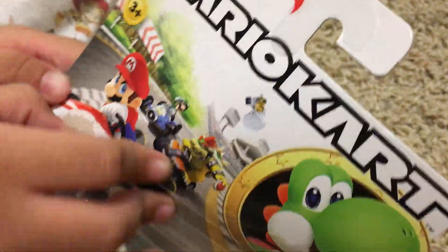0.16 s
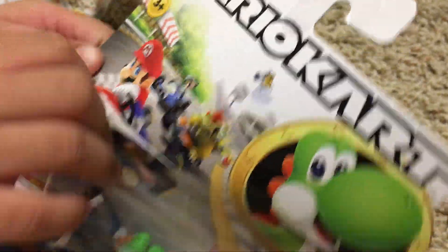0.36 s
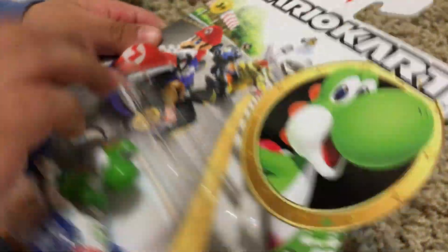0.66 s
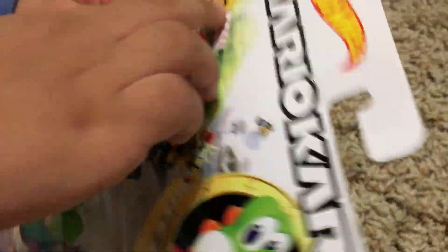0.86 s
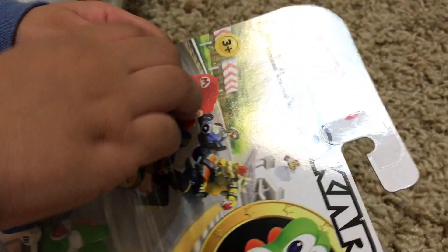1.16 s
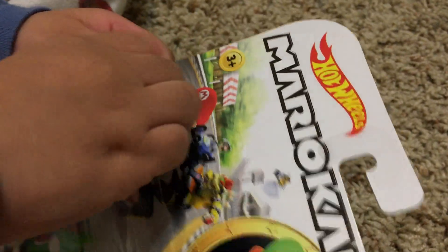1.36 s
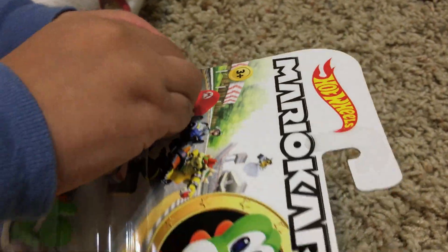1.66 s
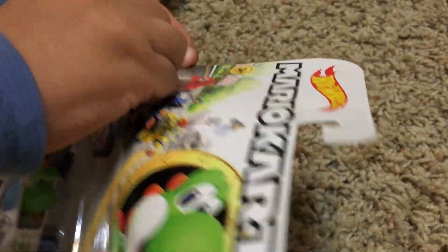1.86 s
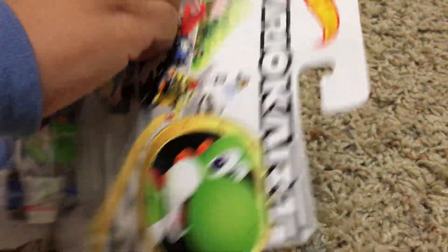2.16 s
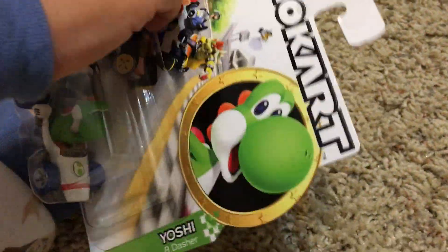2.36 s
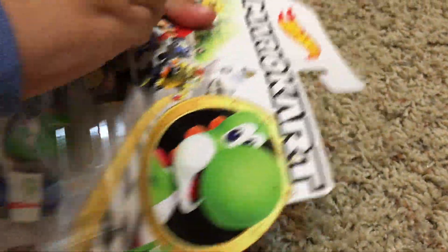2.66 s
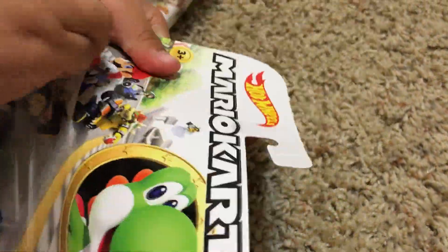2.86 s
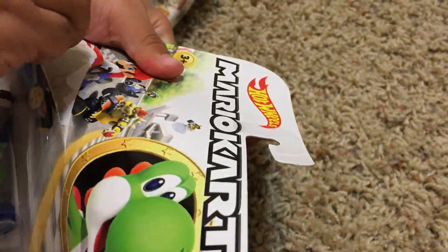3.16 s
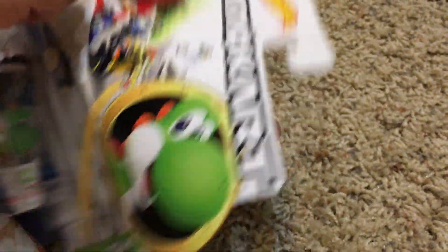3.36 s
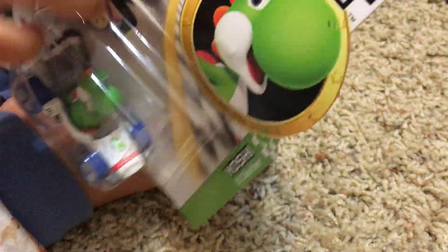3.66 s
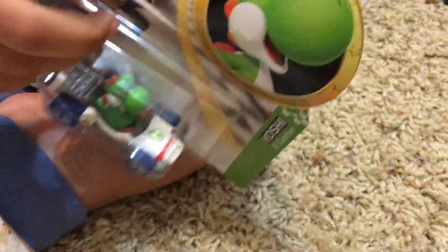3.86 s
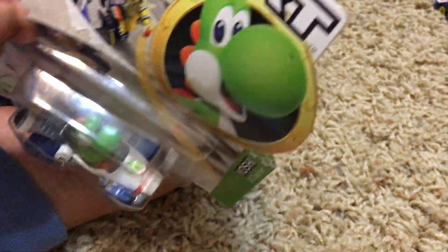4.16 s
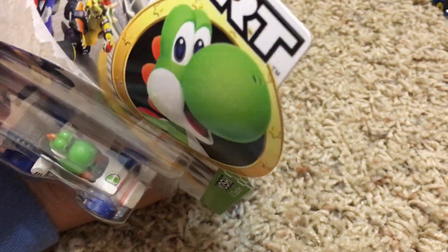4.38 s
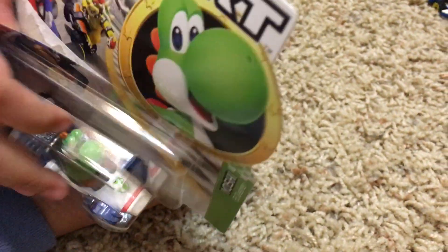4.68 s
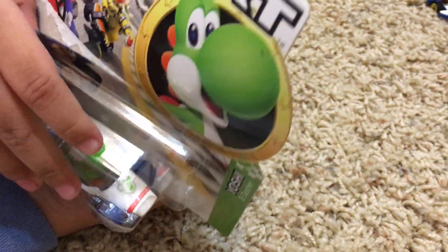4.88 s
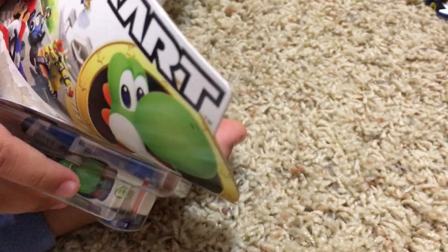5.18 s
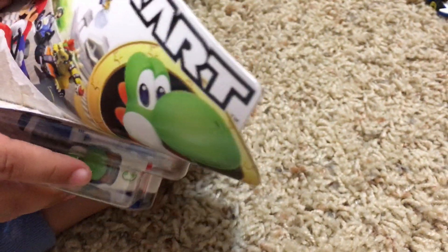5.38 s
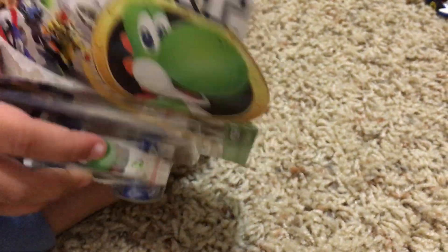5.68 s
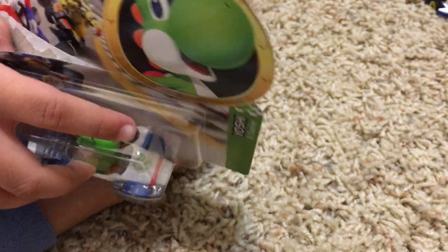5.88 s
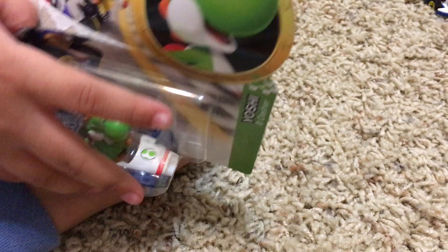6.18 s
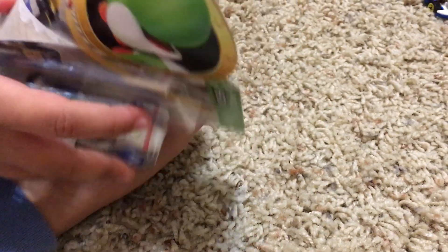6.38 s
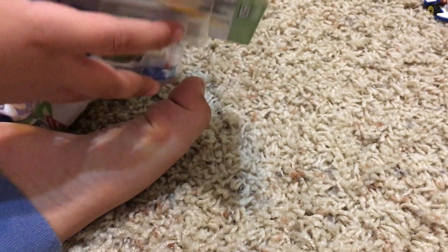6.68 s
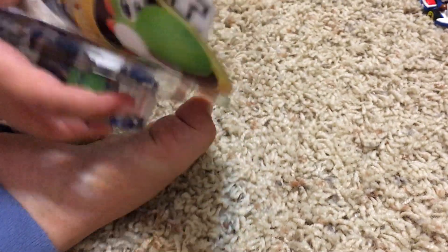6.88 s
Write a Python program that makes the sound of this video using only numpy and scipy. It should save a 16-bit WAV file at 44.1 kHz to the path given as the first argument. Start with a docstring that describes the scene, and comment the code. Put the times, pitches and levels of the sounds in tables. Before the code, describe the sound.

Close, dry sound of hands working on a toy's thin plastic and card package in a quiet carpeted living room. At first, light rubbing and a faint tear; around 0.5 s the shell buckles with one loud, sharp snap and smaller crackles, followed by soft bumps, knocks and nail taps until 1 s. Finger rubs with small creaks continue, strongest near 1.4 s. From 1.7 to 2.5 s card fizzes while plastic crunches and pops in a dense cluster, ending in dull knocks. From about 2.6 to 3.4 s a slow cardboard tear swells, bright and gritty, with fibre ticks. At 3.6-4.1 s another flurry of plastic snaps; then a sparse, quieter stretch with taps and knocks. A thin tear rises around 5.3-5.6 s, then taps and bumps near 5.7-6.1 s. Around 6.4 s crisp crackles and brief tearing, then faint rubbing and small snaps to 7 s.

```python
"""A toy's blister pack, close by on living-room carpet: its thin plastic shell buckles in snaps and crumples.
Snaps are creases and one click convolved with dying noise; resonators ring as the blister's hollow.
Fingers rub in strokes of slip grains, nails tap, soft contacts knock and bump; each hold changes the hollow.
In slow pulls the cardboard backing tears in streams of fine grains, with ticks of thick fibres.
A short, soft room tail follows and a quiet room tone lies beneath."""
import sys
import numpy as np
from scipy import signal
from scipy.io import wavfile
from scipy.ndimage import uniform_filter1d

SR = 44100
rng = np.random.default_rng(int(sys.argv[2]) if len(sys.argv) > 2 else 0)


def bounce(signal):
    """Save signal as a 16-bit WAV file at the path given by the first command-line argument."""
    frames = np.transpose(np.atleast_2d(signal))
    limited = np.clip(frames, -1, 1)
    pcm = np.round(limited * 32767).astype(np.int16)
    wavfile.write(sys.argv[1], SR, pcm)


N = 309972

EDGES_HZ = np.geomspace(22, 17000, 21)
BAND_HZ, BAND_WIDTH_HZ = np.sqrt(EDGES_HZ[1:] * EDGES_HZ[:-1]), np.diff(EDGES_HZ)
BANK = [signal.butter(2, pair, "band", fs=SR, output="sos") for pair in zip(EDGES_HZ, EDGES_HZ[1:])]
BLOW_SAMPLES = SR // 100   # a blow's level is its energy spread over this span

# Spectrum of the plastic shell. Each row: frequency in Hz, relative level in dB per Hz.
SHELL_SPECTRUM = [(50, 0), (400, 2), (700, 1.5), (1200, -3.5), (1700, -1), (2700, -4.5), (3900, -6.5),
                  (5600, -12.5), (8000, -19.5), (15000, -32)]
# Holds on the pack, each lasting until the next. Each row: start in seconds, thump in dB, hollowness in dB,
# bark near 1.2 kHz in dB, pitch of the hollow in Hz, factor by which the fingers widen its modes.
HOLDS = [(0, -10, 7, -5, 700, 1.05), (0.7, 2.5, 3, -5, 675, 1.5), (1.1, -1, 10, 1, 787, 3.6),
         (1.3, 0.5, 10.5, -14, 736, 4.6), (1.54, -2.5, 1, 12, 760, 2.7), (2.301, -12, -4, 11, 740, 1.9),
         (3.5, -6, -6, 8.5, 718, 5), (5.6, -1, 0, -13, 510, 3.1), (6.3, -1, 12.5, -13, 695, 1.6),
         (6.8, 10, 11, -8.5, 750, 3.2)]


def from_db(db):
    """Decibels to gain."""
    return 10 ** (np.asarray(db) / 20)


def blow_gain(db):
    """Gain that gives a blow of energy 1 its level in dB."""
    return np.sqrt(BLOW_SAMPLES) * from_db(db)


def unit_energy(x):
    """Each row scaled to energy 1."""
    return x / np.sqrt(np.sum(x ** 2, axis=-1, keepdims=True) + 1e-20)


def rms_one(x):
    """Each row scaled to rms 1."""
    return unit_energy(x) * np.sqrt(x.shape[-1])


def per_band(points):
    """A table over frequency, read at the band centres on a log axis."""
    hz, value = np.transpose(points)
    return np.interp(np.log(BAND_HZ), np.log(hz), value)


def band_gains(spectrum):
    """Gain of each band, with total power 1."""
    return unit_energy(from_db(per_band(spectrum)) * np.sqrt(BAND_WIDTH_HZ))


def add(out, start_s, sound):
    """Mix a sound in, starting at start_s."""
    i = max(0, round(start_s * SR))
    out[i:i + len(sound)] += sound[:max(0, N - i)]


def resonate(x, modes):
    """Parallel two-pole resonances; each mode is (Hz, width Hz, peak gain dB)."""
    out = 0
    for hz, width_hz, db in modes:
        r = np.exp(-np.pi * width_hz / SR)
        poles = [1, -2 * r * np.cos(2 * np.pi * hz / SR), r * r]
        out = out + from_db(db) * (1 - r * r) / 2 * signal.lfilter([1, 0, -1], poles, x + 1e-18)
    return out


def dying_noise(t60_s, count, size):
    """Rows of dense modes, struck at once and dying together."""
    return rng.standard_normal((count, size)) * from_db(-60 * np.arange(size) / SR / t60_s)


def coloured(spectrum, source):
    """A fresh draw of the source in each band, shaped to a spectrum."""
    return sum(gain * rms_one(signal.sosfilt(band, source() + 1e-18))
               for band, gain in zip(BANK, band_gains(spectrum)))


def grains(spectrum, per_s, spread_db, ring_s, smooth):
    """Tiny slips of uneven size, each a brief burst of fresh noise, over a smooth hiss; rms 1."""
    sizes = from_db(spread_db * np.minimum(rng.exponential(1, N), 4))
    slips = (rng.random(N) < per_s / SR) * sizes ** 2
    power = signal.lfilter([1], [1, -np.exp(-2 / (ring_s * SR))], slips + 1e-12)
    power = power / (uniform_filter1d(power, size=2200) + 1e-9)   # the hand's pace sets the mean
    envelope = np.sqrt((np.abs(power) + smooth) / (1 + smooth))
    return rms_one(coloured(spectrum, lambda: envelope * rng.standard_normal(N)))


def ticks(spectrum, t60_s, count, size):
    """Rows of short damped bursts of one colour."""
    return sum(gain * unit_energy(signal.sosfilt(band, dying_noise(t60_s, count, size)))
               for band, gain in zip(BANK, band_gains(spectrum)))


def blows(events, spectrum, t60_s, size):
    """Single damped blows of one colour, each with its own level."""
    out = np.zeros(N)
    for (start_s, db), sound in zip(events, ticks(spectrum, t60_s, len(events), size)):
        add(out, start_s, blow_gain(db) * sound)
    return out


def cushioned(x, hz):
    """A soft contact: a second-order low-pass takes away what lies above hz."""
    return signal.sosfilt(signal.butter(2, hz, fs=SR, output="sos"), x + 1e-18)


def judder(step_s):
    """Uneven wavering that turns about once a step; rms 1."""
    return rms_one(np.interp(np.arange(N) / SR / step_s, np.arange(2000), rng.standard_normal(2000)))


def grip_at(s):
    """Thump, hollowness and bark of the hold in force at times s, in dB."""
    held_from_s, *colour_db, _, _ = np.transpose(HOLDS)
    return np.array(colour_db)[:, np.searchsorted(held_from_s[1:], s)]


def room_tone():
    """Steady noise of the quiet room, shaped band by band."""
    # Each row: frequency in Hz, relative level in dB per Hz.
    tone_spectrum = [(20, -6), (35, -11), (55, 7.5), (80, -2), (130, -3), (300, -15.5), (600, -24.5),
                     (1500, -32.5), (4000, -28.5), (15500, -39)]
    level_db = -64.5
    return from_db(level_db) * coloured(tone_spectrum, lambda: rng.standard_normal(N))


def finger_pressure():
    """In each stroke a finger lands, presses in an arch and lifts; returns pressure as a level in dB."""
    # Slides on the pack. Each row: start in seconds, length in seconds, mid-stroke level in dB.
    strokes = [(0, 0.17, -70), (0.23, 0.16, -62), (0.477, 0.04, -54), (0.547, 0.093, -47.5),
               (0.807, 0.14, -58.5), (0.938, 0.043, -51), (1.045, 0.18, -58), (1.212, 0.14, -54.5),
               (1.414, 0.083, -43), (1.854, 0.078, -55.5), (1.999, 0.098, -42.5), (2.174, 0.19, -53.5),
               (2.467, 0.049, -51.5), (3.252, 0.14, -64.5), (3.647, 0.027, -51), (3.825, 0.06, -51),
               (4.018, 0.048, -43), (4.73, 0.081, -61), (4.961, 0.034, -63), (5.721, 0.095, -52.5),
               (5.958, 0.3, -62), (6.43, 0.059, -43.5), (6.905, 0.16, -53.5)]
    resting_db = -77.5   # the holding fingers never lie quite still
    swell_db, land_db_per_s, lift_db_per_s = 5.5, 598.5, 322
    t, db = np.arange(N) / SR, resting_db
    for start_s, length_s, level_db in strokes:
        arch = swell_db * np.interp(t, [start_s, start_s + length_s], [-1, 1]) ** 2
        landing = land_db_per_s * np.maximum(start_s - t, 0)
        lifting = lift_db_per_s * np.maximum(t - start_s - length_s, 0)
        db = np.maximum(db, level_db - arch - landing - lifting)
    return db


def rubbing(level_db, slide_db):
    """Skin slides smoothly under a light touch; pressed harder, it sticks and slips and the plastic crackles."""
    # Each row: frequency in Hz, relative level in dB per Hz.
    friction_spectrum = [(60, 1.5), (400, 3), (750, 5), (1200, -1), (2200, -2), (4000, -9.5), (8000, -18),
                         (15000, -32)]
    db = finger_pressure()
    smooth = from_db(slide_db - db)
    return from_db(db + level_db) * grains(friction_spectrum, per_s=590, spread_db=3.0, ring_s=0.0012, smooth=smooth)


def hollow(drive):
    """The blister and its air ring at the pitch of each hold; gripping fingers shorten the ring."""
    # Each row: multiple of the hollow's pitch, width in Hz before the hold widens it, gain in dB.
    hollow_modes = [(1, 28.03, -1.5), (1.25, 26, -2.5), (1.6, 68, -10), (2.3, 130, -8.5)]
    out, t = np.zeros(N), np.arange(N) / SR
    ends_s = [hold[0] for hold in HOLDS[1:]] + [N / SR]
    for (start_s, _, hollow_db, _, hz, damping), end_s in zip(HOLDS, ends_s):
        modes = [(hz * multiple, width_hz * damping, db) for multiple, width_hz, db in hollow_modes]
        held = (t >= start_s) & (t < end_s)
        out += from_db(hollow_db) * resonate(drive * held, modes)
    return out


def card_hoot(rub):
    """The stiff card hoots under a sliding finger, as strongly as the hold lets it bark."""
    # Each row: frequency in Hz, width in Hz, gain in dB.
    card_mode = [(1130, 170, -2.5)]
    _, _, bark_db = grip_at(np.arange(N) / SR)
    return resonate(from_db(bark_db) * rub, card_mode)


def flexed(ring):
    """The walls flex under the fingers: a wavering time shift bends the pitch of the ring."""
    share, step_s = 0.025, 0.03   # shift rms is their product
    t = np.arange(N) / SR
    return np.interp(t + share * step_s * judder(step_s), t, ring)


def room(x, delay_s):
    """A short, soft tail of dying noise, each band with its own decay: carpet and furniture soak up treble."""
    # Each row: frequency in Hz, decay by 60 dB in seconds.
    room_t60 = [(100, 0.55), (800, 0.18), (5000, 0.049), (15000, 0.073)]
    # Each row: frequency in Hz, level of the tail in dB.
    room_return = [(100, -12.5), (800, -13.5), (2500, -14.5), (15000, -17.5)]
    size = SR // 2
    arrived = np.arange(size) / SR > delay_s
    tail = np.zeros(size)
    for band, width_hz, t60_s, db in zip(BANK, BAND_WIDTH_HZ, per_band(room_t60), per_band(room_return)):
        echoes = signal.sosfilt(band, arrived * dying_noise(t60_s, 1, size)[0])
        tail += from_db(db) * np.sqrt(2 * width_hz / SR) * unit_energy(echoes)
    return signal.fftconvolve(x, tail)[:N]


def pull_effort(start_s, hardest_s, stop_s, level_db, build_db):
    """A pull catches, builds up, slackens and stops; returns its level in dB."""
    ease_db, catch_db_per_s, stop_db_per_s = 18, 750, 600.5
    t = np.arange(N) / SR
    build = 1 - np.sin(np.pi / 2 * np.interp(t, [start_s, hardest_s], [0, 1]))
    db = level_db - build_db * build - ease_db * np.interp(t, [hardest_s, stop_s], [0, 1])
    return db - catch_db_per_s * np.maximum(start_s - t, 0) - stop_db_per_s * np.maximum(t - stop_s, 0)


def tearing(fizz_db, card_db, full_pull_db, full_per_s, least_per_s, merge_per_s):
    """Fine fibres fizz and coarse ones rasp, in a stream when pulled hard; the flap rings anew in each pull."""
    # Pulls on the card. Each row: start, hardest moment and stop in seconds, level in dB before fizz_db or
    # card_db, build-up in dB, rasp gain in dB, ring of the loosened flap in Hz, its gain in dB.
    pulls = [(0.165, 0.352, 0.45, -56, 22.5, -8.5, 12600, 4), (1.074, 1.195, 1.22, -69, 22, 1, 6040, 9),
             (1.729, 1.905, 2.28, -52.5, 11, -6.5, 8600, 1), (2.544, 3.071, 3.317, -46, 25, -6, 13400, 0.5),
             (3.166, 3.3, 3.44, -54, 6, -5, 3000, 9.5), (4.26, 4.435, 4.5, -66, 31, -9, 5920, 8.5),
             (5.106, 5.179, 5.19, -62.5, 1.5, -11.5, 4520, -3),
             (5.227, 5.509, 5.67, -51.5, 10.5, -19.5, 3950, 6.5),
             (6.293, 6.49, 6.59, -58, 7, -2, 11600, -1), (6.6, 6.686, 6.9, -60.5, 14.5, -8, 9850, -4)]
    # Each row: frequency in Hz, relative level in dB per Hz.
    fizz_spectrum = [(500, -47), (2500, -6.5), (5000, -4.5), (9000, -0.5), (12000, -5), (15500, -6.5)]
    # Each row: frequency in Hz, relative level in dB per Hz.
    rasp_spectrum = [(350, -57), (650, -20), (1100, 3.5), (1900, -4), (3200, 3.5), (4300, 4), (6000, -3),
                     (10000, -9.5)]
    flap_width_hz, judder_db, judder_s = 900, 1, 0.008
    efforts = [from_db(np.maximum(pull_effort(*shape), -150)) for *shape, _, _, _ in pulls]
    per_s = least_per_s + full_per_s * sum(efforts) / from_db(full_pull_db)
    fizz = from_db(fizz_db) * grains(fizz_spectrum, per_s, spread_db=4.0, ring_s=0.00022, smooth=per_s / merge_per_s)
    rasp = from_db(card_db) * grains(rasp_spectrum, per_s / 2, spread_db=3.0, ring_s=0.0028, smooth=0.1)
    out = 0
    for effort, (*_, rasp_db, flap_hz, flap_db) in zip(efforts, pulls):
        flap = resonate(fizz, [(flap_hz, flap_width_hz, flap_db)])
        out = out + effort * (fizz + from_db(rasp_db) * rasp + flap)
    return out * from_db(judder_db * judder(judder_s))   # the glue holds and gives unevenly


def taps():
    """Nails tap the plastic, and weak buckles of the shell click alike: bare damped bursts in the shell's
    colour."""
    # Each row: start in seconds, level in dB.
    tap_events = [(0.367, -51), (0.722, -53), (0.8199, -48.5), (0.918, -47), (0.989, -50.5), (1.5646, -50),
                  (1.827, -52), (2.101, -47), (2.176, -45), (2.507, -50.5), (4.51, -59), (4.5344, -54),
                  (4.646, -50), (5.706, -52), (5.753, -45), (5.873, -54.5), (5.9124, -53), (5.979, -46.5),
                  (6.033, -56), (6.072, -47.5), (6.191, -53), (6.699, -53.5)]
    return blows(tap_events, SHELL_SPECTRUM, t60_s=0.026, size=2000)


def bumps():
    """The whole pack knocks softly against a hand or leg: an impulse cushioned twice by skin and cloth."""
    # Each row: start in seconds, level in dB.
    bump_events = [(0.380, -53), (0.634, -42), (0.885, -39.5), (2.393, -43), (3.895, -46.5), (5.037, -57),
                   (5.741, -44.5), (6.069, -49), (6.277, -49)]
    cushion_hz = 253
    out = np.zeros(N)
    push = cushioned(cushioned(signal.unit_impulse(SR // 10), cushion_hz), cushion_hz)
    for start_s, db in bump_events:
        add(out, start_s, blow_gain(db) * unit_energy(push))
    return out


def shell(creases_per_s, crease_db, strain_s, strain_db, settle_s, settle_db, level_db):
    """The sheet crackles under strain, flips once among smaller creases, then settles in a fine crunch."""
    # Buckles. Each row: flip time in seconds, level in dB before level_db, crumple time in seconds,
    # crispness in dB, pitch of the facet in Hz.
    snaps = [(0.493, -35, 0.0029, 5, 2010), (0.4990, -37, 0.00049, 13, 1670),
             (0.5425, -13.5, 0.00015, -3, 1630), (0.5613, -39, 0.003, 6, 2080),
             (0.578, -39, 0.0007, 7, 2500), (0.589, -18, 0.0012, -4, 3710), (0.6306, -30, 0.0011, 3, 2170),
             (0.8452, -31.5, 0.0017, -9, 3800), (0.8827, -31, 0.000055, -8, 4460),
             (0.8902, -36.5, 0.00027, 4.5, 4270), (1.225, -36, 0.006, 4.5, 2300),
             (1.2387, -38, 0.00039, -38, 2300), (1.3257, -36, 0.00044, -26, 1500),
             (1.433, -35.5, 0.011, -5, 1500), (1.9872, -25.5, 0.0028, 2.5, 1240),
             (2.005, -24, 0.0024, 9.5, 1870), (2.024, -31.5, 0.0035, 8, 1200),
             (2.0731, -23, 0.00045, 2, 2730), (2.159, -31.5, 0.000076, -2, 2220),
             (2.223, -31, 0.0055, 7.5, 2160), (2.2331, -30, 0.00095, 9, 2640),
             (2.2419, -38.5, 0.0005, 11, 1930), (2.388, -30, 0.003, 1, 1180),
             (2.4552, -23, 0.000097, 3.5, 5930), (3.6566, -36, 0.0039, -7, 1710),
             (3.6993, -31, 0.00057, 2.5, 3840), (3.706, -31.5, 0.00062, 1, 1230),
             (3.712, -31.5, 0.00078, 0, 1200), (3.8184, -24.5, 0.0014, 3.5, 5600),
             (3.857, -35.5, 0.0012, 2, 1770), (3.873, -36.5, 0.00034, -5, 2330),
             (3.9017, -25, 0.00064, 5.5, 1790), (3.9941, -31, 0.00036, 1.5, 1240),
             (4.027, -34.5, 0.00061, -2, 2400), (4.0544, -23, 0.00084, 1, 2400),
             (4.0679, -29.5, 0.00046, -8, 2940), (4.075, -27.5, 0.0013, -1, 1670),
             (4.6287, -30.5, 0.00027, -4, 1150), (5.732, -35, 0.000091, 8.5, 2250),
             (6.347, -43, 0.00089, 5, 1172), (6.436, -31, 0.0015, -1, 3700),
             (6.4468, -35, 0.00025, 11, 3740), (6.4635, -26.5, 0.00097, 4.5, 3220),
             (6.9035, -37, 0.0011, 3.5, 3420), (6.912, -40.5, 0.00055, 7.5, 3500),
             (6.9959, -36, 0.00045, 11, 4130)]
    # Each row: frequency in Hz, decay by 60 dB in seconds.
    shell_t60 = [(150, 0.014), (700, 0.029), (2000, 0.017), (9000, 0.0069)]
    size, lead = 3000, 700   # samples; the flip comes after the lead
    body_share = 0.96   # share of the hollowness that swells the broad middle of a snap
    facet_q, facet_db = 11.4, 5.5   # the facet that flips rings briefly
    flip_s, db, crumple_s, crisp_db, facet_hz = np.transpose(snaps)
    count = len(flip_s)
    t = (np.arange(size) - lead) / SR

    creases = (rng.random((count, size)) < creases_per_s / SR) * rng.standard_normal((count, size))
    away = np.where(t < 0, -t, t / 2)   # creases build up twice as fast as they die down
    crumple = from_db(crease_db) * np.exp(-away / crumple_s[:, None])
    strain = from_db(strain_db) * np.exp(-np.abs(t) / strain_s)
    settle = from_db(settle_db) * np.exp(-np.abs(t) / settle_s)
    clicks = creases * (crumple + np.where(t < 0, strain, settle))
    clicks[:, lead] += 1   # the flip

    colour_db = []
    for thump, hollowness, bark, crisp in zip(*grip_at(flip_s), crisp_db):
        body = body_share * hollowness
        colour_db.append(per_band([(420, thump), (600, body), (850, body), (1200, bark),
                                   (1450, 0.0095), (3200, 0), (6500, crisp)]))
    gains = blow_gain(np.array(colour_db) + db[:, None] + level_db) * band_gains(SHELL_SPECTRUM)

    sounds, out = 0, np.zeros(N)
    for band, t60_s, gain in zip(BANK, per_band(shell_t60), gains.T):
        ringing = signal.fftconvolve(clicks, dying_noise(t60_s, count, size), axes=1)[:, :size]
        sounds = sounds + gain[:, None] * unit_energy(signal.sosfilt(band, ringing))
    for start_s, hz, sound in zip(flip_s - lead / SR, facet_hz, sounds * signal.windows.tukey(size)):
        add(out, start_s, sound + resonate(sound, [(hz, hz / facet_q, facet_db)]))
    return out


def knocks():
    """Fingertips, and the toy shifting inside, knock dully on the shell; the soft contact loses treble."""
    # Each row: start in seconds, level in dB before the treble is lost.
    knock_events = [(0.703, -51.5), (0.7995, -41.5), (1.5056, -46.5), (1.616, -56.5), (2.268, -40.5),
                    (2.399, -36.5), (4.1044, -45.5), (4.738, -44), (5.038, -58.5), (5.207, -59.5),
                    (6.303, -58), (6.552, -55.5), (6.873, -57)]
    return cushioned(blows(knock_events, SHELL_SPECTRUM, t60_s=0.044, size=2000), hz=2940)


def pops(t60_s):
    """Thick fibres and spots of glue let go with a tick, and the strip of card rings for an instant."""
    # Each row: start in seconds, level of the tick in dB, ring in Hz.
    pop_events = [(0.756, -70, 9530), (1.9392, -47.5, 8650), (2.7295, -49.5, 7000), (4.408, -67, 5500),
                  (2.838, -51.5, 4250), (2.9197, -52, 9000), (3.0236, -43.5, 1330), (3.0563, -43.5, 7700),
                  (3.097, -48.5, 13600), (3.172, -49, 2950), (3.2812, -49.5, 2845), (5.472, -58.5, 4260),
                  (5.498, -56.5, 3800), (5.578, -70.5, 3660)]
    # Each row: frequency in Hz, relative level in dB per Hz.
    pop_spectrum = [(500, -10), (1500, -14), (3200, -4), (6000, -10), (9000, -4), (15000, -9.5)]
    ring_width_hz, ring_db = 1400, 9.5
    out = np.zeros(N)
    for (start_s, db, hz), tick in zip(pop_events, ticks(pop_spectrum, t60_s, len(pop_events), size=800)):
        strip = resonate(tick, [(hz, ring_width_hz, ring_db)])
        add(out, start_s, blow_gain(db) * (tick + strip))
    return out


def scene():
    """Snaps, taps, knocks and rubbing drive the blister's ring; the card tears; all sounds into the room."""
    snap_ring_db, rub_ring_db = -5.5, -11.5   # drive of the ring; a sliding finger damps it
    rub = rubbing(level_db=0.5, slide_db=-67.5)
    card = tearing(fizz_db=-4.0, card_db=1.5, full_pull_db=-48.0, full_per_s=1200, least_per_s=220, merge_per_s=1700)
    snapping = shell(creases_per_s=5000, crease_db=-4.0, strain_s=0.006, strain_db=-33.5,
                     settle_s=0.044, settle_db=-36, level_db=-7.5)
    plastic = snapping + taps() + knocks()
    ring = hollow(from_db(snap_ring_db) * plastic + from_db(rub_ring_db) * rub)
    ring = flexed(ring + card_hoot(rub))
    pack = plastic + rub + ring + card + pops(t60_s=0.0037) + bumps()
    return (pack + room(pack, delay_s=0.00069) + room_tone())[None]


def record(dry):
    """The microphone loses the deepest bass, lifts one treble region and dips just above it; the top is cut."""
    cutoff_hz = 16100
    heard = dry + resonate(dry, [(9300, 670, -7.5)]) - resonate(dry, [(10430, 550, -9.0)])
    heard = signal.sosfilt(signal.butter(2, 32, "high", fs=SR, output="sos"), heard)
    return signal.sosfilt(signal.ellip(10, .2, 80, cutoff_hz, fs=SR, output="sos"), heard)


dry = scene()
out = record(dry)
bounce(out)
```